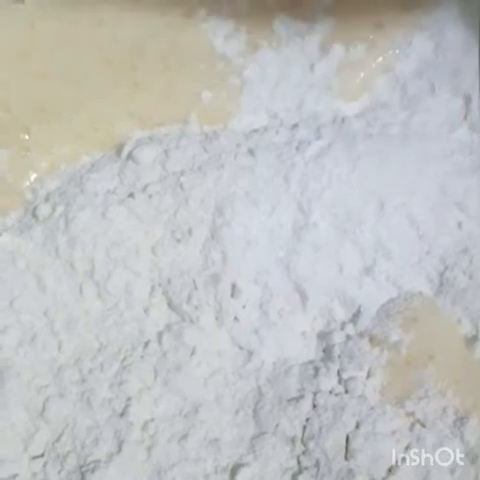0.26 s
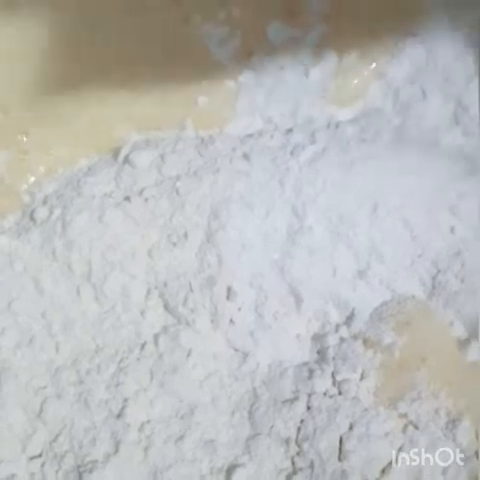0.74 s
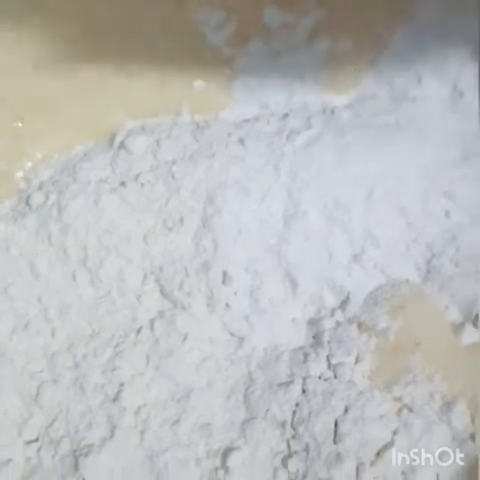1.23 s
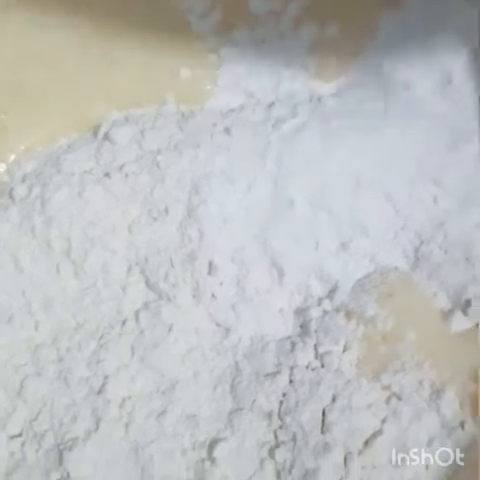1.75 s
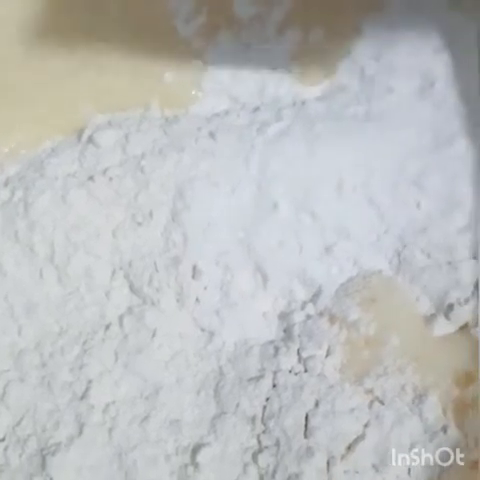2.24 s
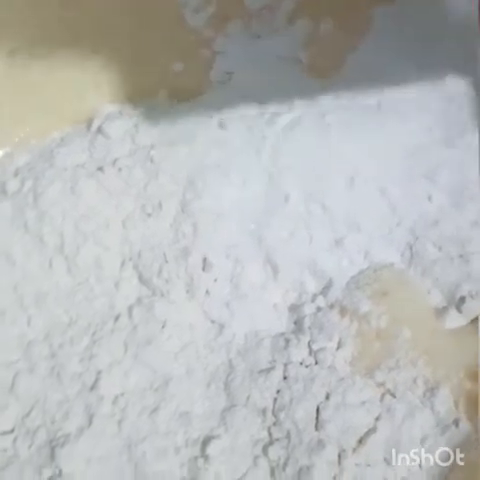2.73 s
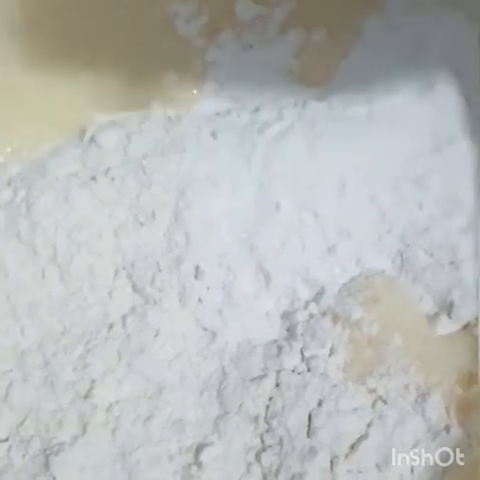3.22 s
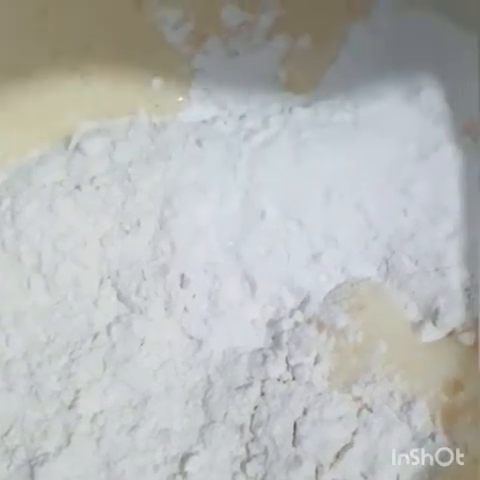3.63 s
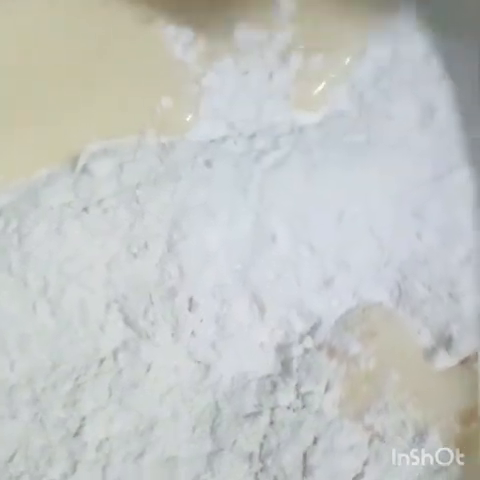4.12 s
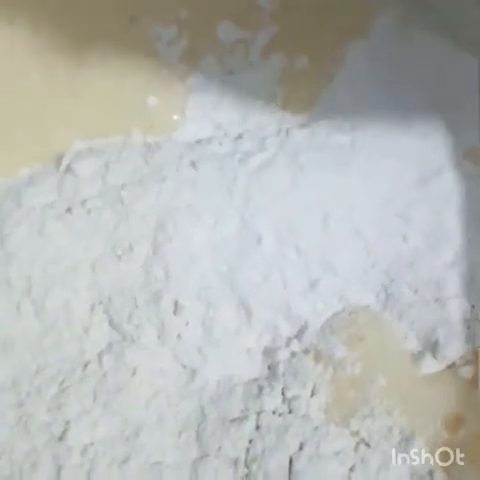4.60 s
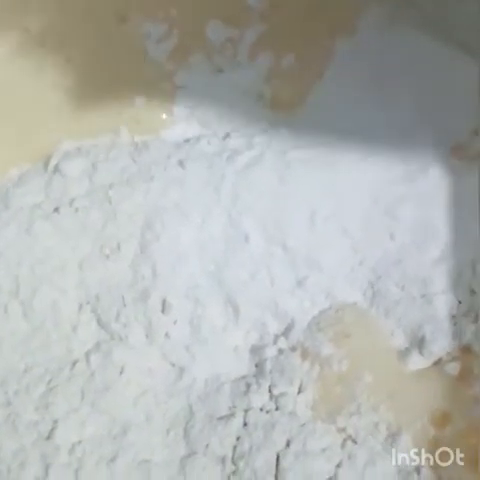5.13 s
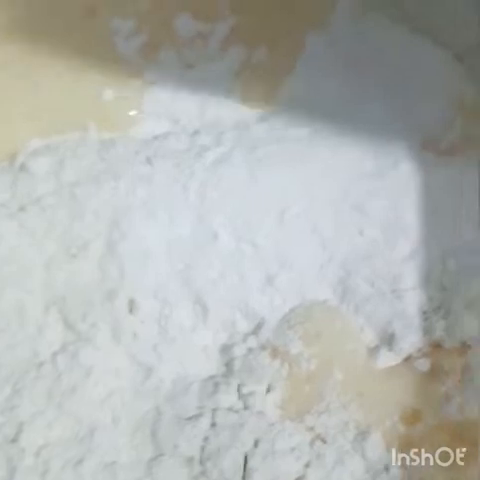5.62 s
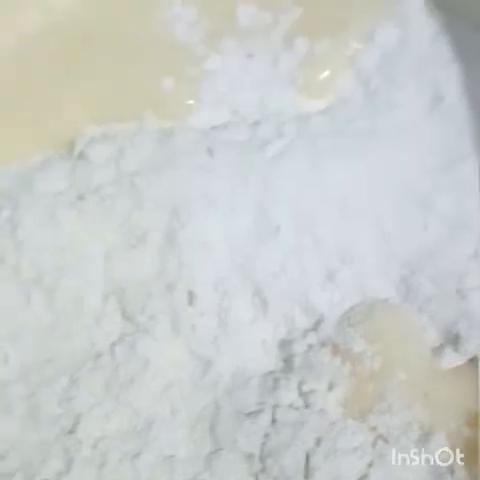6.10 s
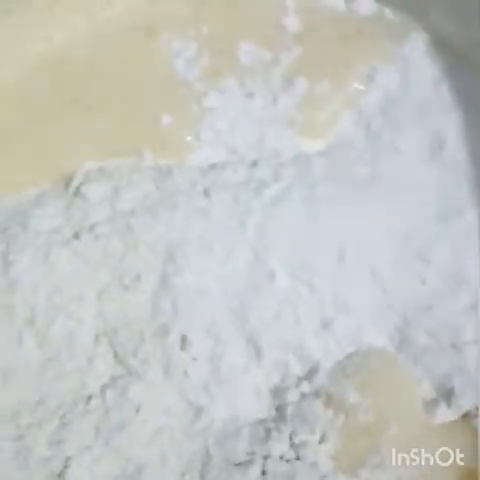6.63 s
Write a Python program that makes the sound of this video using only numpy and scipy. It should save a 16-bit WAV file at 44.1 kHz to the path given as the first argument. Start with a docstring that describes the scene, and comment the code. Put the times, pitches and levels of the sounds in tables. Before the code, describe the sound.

Close stereo microphone, packet slightly to the left, small reverberant kitchen. About five light, sharp taps a second knock on a stuffed foil packet, each a dull pop plus dry crack and a brief hiss of powder. After two seconds it crackles as it is turned, then four taps, a lone one, and a final trio. Quiet low rumble throughout; the end has only faint rustles.

```python
"""A low uneven rumble with a faint hum and gliding drone, sliding powder and small foil crackles; then runs of
taps. A finger taps a sachet of baking powder over a mixing bowl, close to the microphone, in a small kitchen.
Each tap rings packet resonances (pop), cracks the foil (snap, then a click as the finger lifts off) and spills
powder (noise grains). Between runs the packet is turned and crinkles: short bursts of grains, each with a soft
push on the packet. Bowl echoes and room ringing are decaying noise; the standing waves are narrow resonances."""
import sys
import numpy as np
from scipy import signal
from scipy.fft import rfft, irfft
from scipy.io import wavfile

SR = 44100
rng = np.random.default_rng(int(sys.argv[2]) if len(sys.argv) > 2 else 0)


def waveform_to_disk(signal):
    """Save audio, clipped to [-1, 1], as 16-bit WAV at the path in sys.argv[1]."""
    frames = np.transpose(np.atleast_2d(signal))
    scaled = np.clip(frames, -1, 1) * 32767
    samples = np.round(scaled).astype(np.int16)
    wavfile.write(sys.argv[1], SR, samples)


N = 302526
TIME = np.arange(N) / SR   # s


def from_db(db):
    """Decibels to gain."""
    return 10 ** (np.asarray(db) / 20)


def in_time(rows):
    """Columns of a curve, interpolated at every sample."""
    t_s, *columns = np.transpose(rows)
    return [np.interp(TIME, t_s, column) for column in columns]


def at_hz(points, hz):
    """Read a table on a log-frequency axis."""
    f_hz, value = np.transpose(points)
    return np.interp(np.log(np.maximum(hz, 1)), np.log(f_hz), value)


def convolve(x, response):
    """Pass a sound through a response, channel by channel."""
    return signal.fftconvolve(np.atleast_2d(x), np.atleast_2d(response), axes=1)[:, :N]


def colour(spectrum, unit_power=False, size=4096):
    """Causal (minimum-phase) response with the given spectrum, by folding the cepstrum."""
    gain = from_db(at_hz(spectrum, np.fft.rfftfreq(size, 1 / SR)))
    cepstrum = irfft(np.log(gain))
    cepstrum[1:size // 2] *= 2
    cepstrum[size // 2 + 1:] = 0
    response = irfft(np.exp(rfft(cepstrum)))
    return response / np.linalg.norm(response) if unit_power else response


def resonate(x, hz, width_hz):
    """Two-pole resonance, peak gain near 1."""
    r = np.exp(-np.pi * width_hz / SR)
    numerator = np.array([1, 0, -1]) * (1 - r * r) / 2
    denominator = [1, -2 * r * np.cos(2 * np.pi * hz / SR), r * r]
    return signal.lfilter(numerator, denominator, x + 1e-18)   # offset avoids denormals


def lowpass(x, hz, order=1):
    """Gentle treble roll-off."""
    return signal.sosfilt(signal.butter(order, min(hz, .45 * SR), fs=SR, output="sos"), x)


def delayed(x, seconds):
    """The same sound a little later."""
    t = TIME[:len(x)]
    return np.interp(t - seconds, t, x, left=0)


def add(out, at_s, piece):
    """Mix a short sound in at a time."""
    start = round(at_s * SR)
    out[:, start:start + piece.shape[-1]] += piece[:, :N - start]


def stereo_noise(alike, size=N):
    """White noise in two channels with the given correlation."""
    mid, side = rng.standard_normal((2, size))
    alike = np.clip(alike, -1, 1)
    return np.sqrt((1 + alike) / 2) * mid + np.sqrt((1 - alike) / 2) * np.array([side, -side])


def waver(rate_hz):
    """Slow random movement with spread near 1; rate in knots per second."""
    knots = rng.standard_normal(400)
    return np.interp(TIME * rate_hz, np.arange(len(knots)), knots)


def swell(at_s, rise_s, fall_s):
    """Envelope that grows exponentially up to a moment and dies after it."""
    t = TIME - at_s
    return np.exp(-np.minimum(np.maximum(-t / rise_s, t / fall_s), 20))


def arch(at_s, rise_s, hold_s, fall_s):
    """Envelope with exponential attack, hold and release."""
    before = (at_s - TIME) / rise_s
    after = (TIME - at_s - hold_s) / fall_s
    return np.exp(-np.clip(np.maximum(before, after), 0, 20))


EAR_LAG_S = 0.0003247


def from_left(pair):
    """The packet is held to the left, so the right channel hears it later."""
    return np.array([pair[0], np.interp(TIME - EAR_LAG_S, TIME, pair[-1])])


# background spectrum: [f/Hz, relative level/dB]
AIR_SPECTRUM = [(30,-32),(102,2),(150,-13.5),(240,-8),(350,-7.5),(560,-18.5),(700,-27),(1000,-21.5),(1600,-31.5),(2050,-24),(2700,-38),(5000,-37),(10000,-45),(16000,-41.5)]
# background level before the air_db trim: [t/s, level/dB]
AIR_LEVEL = [(0,-57.5),(1,-54.5),(2,-49.5),(4.5,-52),(5.5,-55),(6.2,-57),(6.86,-56)]
# drone pitch: [t/s, f/Hz]
DRONE_PITCH = [(0,92),(1.65,106),(2.2,103),(2.9,70),(3.35,66.5),(6.86,60)]
# drone swells before the drone_db trim: [t/s, level/dB, Gaussian half length/s]
DRONE_BUMPS = [(1.93,-52,.13),(3.336,-57.5,.26)]
DRONE_FLOOR_DB = -71.5   # before the drone_db trim
HUM_HZ, HUM_DB = 197.3, -64


def background(air_db, drone_db):
    """Coloured noise rumble, a steady sine hum and a sine drone that glides up, then sinks."""
    air_level_db, = in_time(AIR_LEVEL)
    pitch_hz, = in_time(DRONE_PITCH)
    strength = from_db(DRONE_FLOOR_DB)
    for at_s, db, half_s in DRONE_BUMPS:
        strength = strength + from_db(db) * np.exp(-np.minimum(((TIME - at_s) / half_s) ** 2, 20) / 2)
    shared = lowpass(stereo_noise(0.93), 1200) * from_db(2.0 * waver(rate_hz=8.6))
    diffuse = signal.sosfilt(signal.butter(1, 900, "high", fs=SR, output="sos"), stereo_noise(0.1))
    air = from_db(air_level_db + air_db) * convolve(shared + diffuse, colour(AIR_SPECTRUM, unit_power=True))
    drone = from_db(drone_db) * strength * np.sin(2 * np.pi * np.cumsum(pitch_hz) / SR)
    hum = from_db(HUM_DB) * np.sin(2 * np.pi * HUM_HZ * TIME)
    return air + drone + hum


def grains(spread_db, alike):
    """Tiny contacts of very uneven size that come in clumps; rms near 1."""
    single = np.repeat(rng.standard_normal(N // 20 + 1), 20)[:N]
    clumps_db = 2.2 * np.repeat(rng.standard_normal(N // 180 + 1), 180)[:N]
    sizes = from_db(spread_db * single + clumps_db)
    return stereo_noise(alike) * sizes / np.sqrt(np.mean(sizes ** 2))


# packet tilted, powder slides along the foil: [start t/s, hold/s, relative level/dB]
TILTS = [(0,0.17,-54.5),(0.373,0.034,-64),(0.586,0.29,-59.5),(2.137,0.38,-72),(2.387,0.055,-48.5),(2.65,0.21,-45.5),(2.993,0.02,-52),(4.027,0.34,-55.5),(4.678,0.29,-58.5),(5.525,0.18,-63),(6.084,0.033,-66.5),(6.275,0.061,-63.5)]
# powder spectrum: [f/Hz, relative level/dB]
POWDER_SPECTRUM = [(500,-10),(2000,-2),(3500,-12.5),(5500,-5),(8000,-3),(10000,-8.5),(16000,-11)]
TILT_ATTACK_S, TILT_RELEASE_S, TILT_WAVER_DB = 0.011, 0.032, 1.5
# powder jolted out by each tap; level relative, as in TILTS
SPILL_DB, SPILL_AFTER_S, SPILL_RISE_S, SPILL_FALL_S = -54, .032, 0.022, 0.073
SPILL_FOLLOWS, FIRM_TAP_DB = .5, -21   # dB of spill per dB of pop, relative to a firm tap


def rustle(level_db, ticks_per_s, ticks_db):
    """Powder slides unevenly during tilts and after each tap; the moving foil ticks now and then."""
    flow = sum(from_db(db) * arch(s, TILT_ATTACK_S, hold_s, TILT_RELEASE_S) for s, hold_s, db in TILTS)
    flow = flow * from_db(level_db + TILT_WAVER_DB * waver(rate_hz=32))
    for at_s, pop_db, *_ in TAPS:
        spill_db = level_db + SPILL_DB + SPILL_FOLLOWS * (pop_db - FIRM_TAP_DB)
        flow = flow + from_db(spill_db) * swell(at_s + SPILL_AFTER_S, SPILL_RISE_S, SPILL_FALL_S)
    tick_now = rng.random(N) < ticks_per_s / SR
    ticks = tick_now * rng.uniform(-0.67, 1, N) * from_db(ticks_db)
    powder = grains(spread_db=2.0, alike=0.073)
    return convolve(flow * (powder + ticks), colour(POWDER_SPECTRUM, unit_power=True))


# creases buckling as the grip shifts: [t/s, relative level/dB, decay/s, treble gain/dB]
CRINKLES = [(.010,-46.5,0.015,-10),(.028,-45,0.0038,15),(2.147,-39,0.0022,-5.5),(2.182,-44.5,0.012,-22),(2.307,-36.5,.0025,-26),(2.345,-47,0.024,-28),(2.451,-36,0.012,4),(2.461,-23,0.0048,-9),(2.576,-24.5,.0027,7),(2.591,-38.5,0.003,14.5),(2.635,-42.5,0.051,-23),(2.772,-36,0.0014,13.5),(2.794,-41.5,0.007,-19),(2.845,-36.5,0.0022,-15),(2.858,-41.5,0.0069,-1.5),(4.475,-55,0.0043,5),(6.456,-37,0.0017,-22),(6.465,-38,0.023,-28),(6.583,-55.5,0.027,-17)]
# crease spectrum: [f/Hz, relative level/dB]
CREASE_SPECTRUM = [(150,-5),(700,-1),(1500,-1),(2300,4.5),(4000,-0.5),(7000,1.5),(10000,-6.5),(16000,-13.5)]
# finger lifts off the foil after a tap; level relative to the snap column
REBOUND_S, REBOUND_DB, REBOUND_LENGTH_S = .038, -16.5, 0.0067


def crinkles(rise_share, level_db, treble_hz, rebound_treble_db):
    """Creases, and the finger lifting off after each tap, give way in short runs of tiny cracks, each with its
    own treble."""
    rebounds = [(s + REBOUND_S, snap_db + REBOUND_DB, REBOUND_LENGTH_S, rebound_treble_db)
                for s, _, snap_db, *_ in TAPS]
    body_envelope, top_envelope = 0, 0
    for at_s, db, length_s, treble_db in CRINKLES + rebounds:
        run = from_db(db + level_db) * swell(at_s, rise_share * length_s, length_s)
        body_envelope = body_envelope + run
        top_envelope = top_envelope + run * from_db(treble_db)
    cracks = grains(spread_db=6.0, alike=0.2)
    body = lowpass(cracks * body_envelope, treble_hz)
    top = cracks * top_envelope
    return convolve(body + top - lowpass(top, treble_hz), colour(CREASE_SPECTRUM, unit_power=True))


def blow(thud_db, hard_hz, contact_s, thud_hz, size=2048):
    """Force of one touch: a short push rounded by the finger pad; a fleshier one has more bass."""
    force = signal.unit_impulse(size, 1)
    force = force + (from_db(thud_db) - 1) * lowpass(force, thud_hz)
    return delayed(lowpass(force, hard_hz, order=2), contact_s)


# powder-filled packet, f scaled by tautness: [f/Hz, width/Hz, mean left gain/dB, mean right gain/dB]
PACKET_MODES = [(284,94,31.5,32),(560,87,21.5,12.5),(982,117,-1,41.5),(1307,28,38,5.5),(1366,150,13,42),(1824,130,42,39),(2056,460,1.5,28.5),(2444,200,34,33.5),(3700,340,15,16)]


def packet(force, tautness, spot_db, bend_s):
    """Damped resonances, struck at a new spot each time; low bending waves arrive later."""
    out = 0
    for hz, width_hz, left_db, right_db in PACKET_MODES:
        lag_s = bend_s / np.sqrt(hz / PACKET_MODES[0][0])
        ring = delayed(resonate(force, hz * tautness, width_hz), lag_s)
        gain_db = np.array([[left_db], [right_db]]) + spot_db * rng.standard_normal()
        out = out + from_db(gain_db) * ring
    return out


def bowl(after_s, decay_s, apart_hz, size=2048):
    """Dense reflections between packet, hand and bowl; mainly short waves differ from side to side."""
    t = np.maximum(TIME[:size] - after_s, 0)
    mid, side = rng.standard_normal((2, size))
    side = side - lowpass(side, apart_hz)
    response = np.array([mid + side, mid - side]) * np.sqrt(t) * np.exp(-t / decay_s)
    return response / np.linalg.norm(response, axis=1, keepdims=True)


# room decay to -60 dB: [f/Hz, T60/s]
ROOM_DECAY = [(100,0.58),(400,0.58),(1000,0.5),(2000,0.46),(3000,0.32),(7000,0.21),(16000,0.29)]


def kitchen(build_s, alike_below_hz, size=32768):
    """Diffuse response: builds up, decays at a rate set per band, alike on both sides in the bass."""
    t, out = TIME[:size], 0
    edges_hz = np.geomspace(40, 19000, 15)
    for low, high in zip(edges_hz, edges_hz[1:]):
        hz = np.sqrt(low * high)
        noise = stereo_noise(1 / (1 + (hz / alike_below_hz) ** 2), size=size)
        band = signal.sosfilt(signal.butter(2, [low, high], "band", fs=SR, output="sos"), noise)
        band *= from_db(-60 * t / at_hz(ROOM_DECAY, hz)) * (1 - np.exp(-t / build_s))
        energy = np.sum(band ** 2, axis=1, keepdims=True)
        out = out + band * np.sqrt(2 * (high - low) / SR / energy)   # flat spectrum overall
    return out


# finger on packet: [t/s, relative pop level/dB, relative snap level/dB, thud re pop/dB, tautness/pitch factor]
TAPS = [(0.232,-43,-42,13.5,1.005),(0.656,-26.5,-32.5,3.5,1.51),(0.864,-19.5,-18.5,3.5,1.21),(1.096,-22.5,-30,5.5,1.17),(1.309,-16.5,-20,-0.5,1.074),(1.535,-20.5,-33,3.5,1.085),(1.738,-18.5,-23.5,2.5,1.056),(1.96,-17.5,-18,5,1.056),(3.072,-21,-29.5,-5,1.035),(3.272,-20.5,-19,-6,1.14),(3.504,-21,-26,-8,1.01),(3.696,-43.5,-38,9,1.13),(3.735,-18.5,-21,-1.5,1.11),(4.226,-18.5,-25,2,1.14),(5.115,-18,-25,-2,1.14),(5.327,-16.5,-32,-3,1.04),(5.548,-20.5,-29,6,1.09)]
# tap echoes from bowl and room: [f/Hz, gain/dB]
ECHO_SPECTRUM = [(50,3.5),(110,9),(240,12.5),(500,17.5),(750,14.5),(1100,22),(1400,21.5),(1650,16),(1950,24),(2400,11.5),(3200,8),(5000,-6.5),(9000,-12),(16000,-28.5)]
# standing waves of the kitchen: [f/Hz, width/Hz, gain/dB]
ROOM_MODES = [(199,2,27.5),(317.2,4.1,40),(348.6,6,29.5),(534,36,30),(1150,8.8,26.5),(1570,7.7,31.5),(1850,14,37),(1945,54,34)]
CONTACT_HZ, CONTACT_OCT_PER_DB = 6640, 0.118   # more snap than pop: harder contact
PUSH_DB, PUSH_FOLLOWS = -28, 0.46   # grip nudges packet: level at a 0 dB crease, dB per dB of crease


def pops(rooms, bowl_db, room_db, push_thud_db, push_hz):
    """Each tap or grip push rings the packet, echoes in the bowl and sets the room going."""
    touches = []
    for s, pop_db, snap_db, thud_db, taut in TAPS:
        hard_hz = CONTACT_HZ * 2 ** (CONTACT_OCT_PER_DB * (snap_db - pop_db))
        touches.append((s, pop_db, thud_db, taut, hard_hz))
    for s, crease_db, *_ in CRINKLES:
        touches.append((s, PUSH_DB + PUSH_FOLLOWS * crease_db, push_thud_db, 1, push_hz))
    forces, direct, echoes = np.zeros((1, N)), np.zeros((2, N)), np.zeros((2, N))
    for k, (s, db, thud_db, taut, hard_hz) in enumerate(touches):
        force = from_db(db) * blow(thud_db, hard_hz, contact_s=0.000927, thud_hz=496)
        add(forces, s, force[None])
        add(direct, s, packet(force, taut, spot_db=2.5, bend_s=0.001582))
        # the hand moves, so the echoes differ from touch to touch
        reflections = bowl(after_s=0.00037, decay_s=0.0043, apart_hz=900)
        add(echoes, s, from_db(bowl_db) * convolve(force, reflections))
        add(echoes, s, from_db(room_db) * convolve(force, rooms[k % len(rooms)]))
    standing = sum(from_db(db) * resonate(forces, hz, width_hz) for hz, width_hz, db in ROOM_MODES)
    return from_left(direct) + convolve(echoes, colour(ECHO_SPECTRUM)) + standing


def clicks(times_s, level_db):
    """One impulse for each contact."""
    out = np.zeros(N)
    out[np.round(times_s * SR).astype(int)] = from_db(level_db)
    return out


# foil snap spectrum: [f/Hz, relative level/dB]
SNAP_SPECTRUM = [(300,-28),(1500,-4),(3000,2),(5000,1.5),(7500,-3),(9500,-11.5),(12000,-18),(16000,-23.5)]


def snaps(delay_s, crack_db, rattle_db, rattle_s):
    """The foil cracks at each tap (impulse) and rattles for a moment (decaying noise)."""
    at_s, _, snap_db = np.transpose(TAPS)[:3]
    crack = from_db(crack_db) * clicks(at_s + delay_s, snap_db)
    rattle = sum(from_db(db + rattle_db) * swell(s + delay_s, .0003, rattle_s)
                 for s, db in zip(at_s, snap_db))
    return convolve(crack + rattle * stereo_noise(0.34), colour(SNAP_SPECTRUM, unit_power=True))


def scene(count=5):
    """The packet close by, the kitchen heard from a few slightly different spots, and the background."""
    rooms = [kitchen(build_s=0.001, alike_below_hz=380) for _ in range(count)]
    snap = snaps(delay_s=0.0012, crack_db=2, rattle_db=-1.5, rattle_s=0.0033)
    handling = crinkles(rise_share=0.31, level_db=1.5, treble_hz=3400, rebound_treble_db=-16.5)
    handling = handling + rustle(level_db=-5.5, ticks_per_s=50, ticks_db=26.5)
    near = from_left(snap) * from_db([[2.3], [-2.5]]) + from_left(handling) * from_db([[-.5], [1.2]])
    far = convolve(from_db(-5.0) * snap, rooms[-1]) + convolve(from_db(-8) * handling, rooms[0])
    touches = pops(rooms, bowl_db=6.5, room_db=8.0, push_thud_db=6, push_hz=3000)
    return near + far + touches + background(air_db=-5.5, drone_db=3.5)


CUTOFF_HZ = 16300


def record(dry):
    """The left channel has a treble peak and a dip above it; the deepest bass and the top are cut."""
    peak = from_db(3.5) * resonate(dry[0], hz=7360, width_hz=1200)
    dip = .5 * resonate(dry[0], hz=9100, width_hz=470)
    left = dry[0] + peak - dip
    pair = signal.sosfilt(signal.butter(2, 32, "high", fs=SR, output="sos"), [left, dry[1]])
    return signal.sosfilt(signal.ellip(10, .2, 70, CUTOFF_HZ, fs=SR, output="sos"), pair)


dry = scene()
out = record(dry)
waveform_to_disk(out)
```